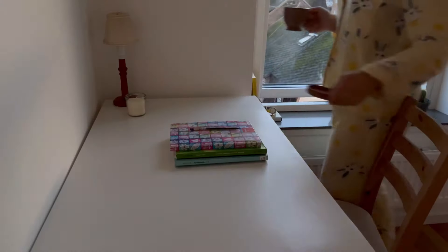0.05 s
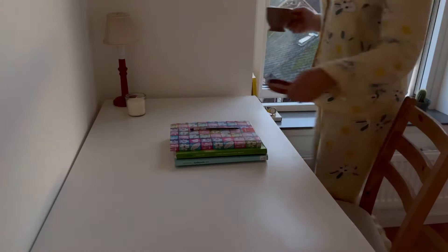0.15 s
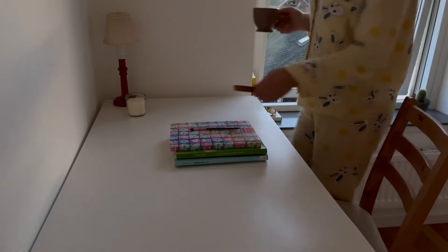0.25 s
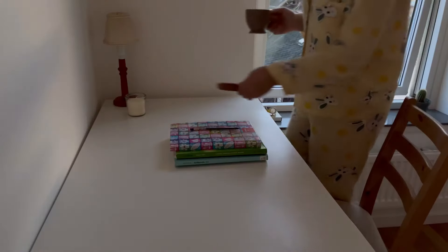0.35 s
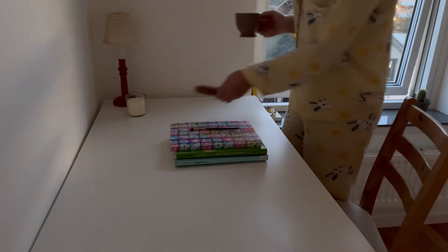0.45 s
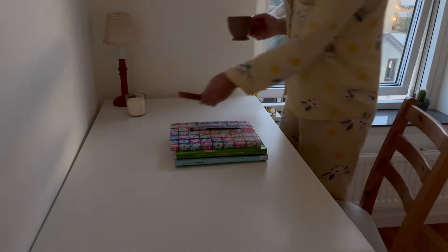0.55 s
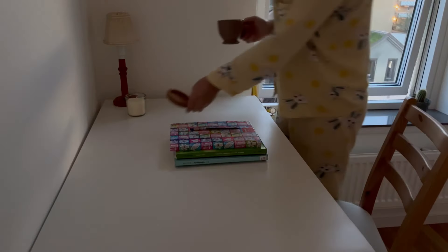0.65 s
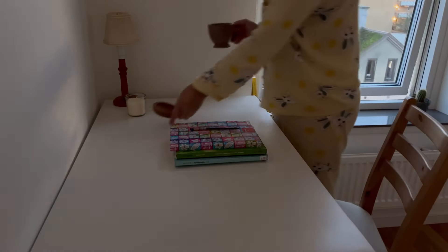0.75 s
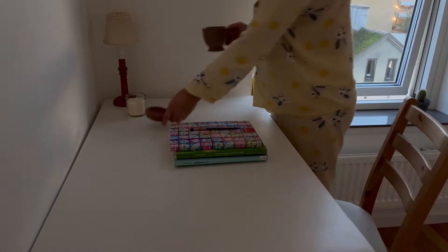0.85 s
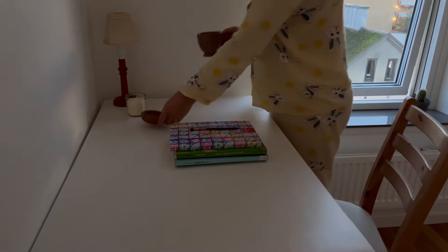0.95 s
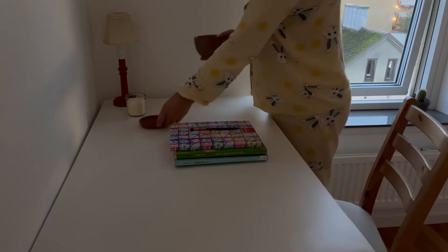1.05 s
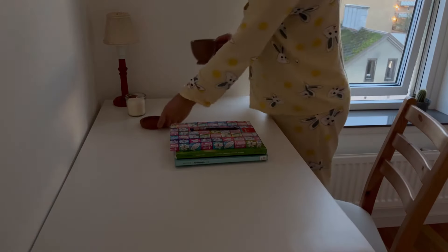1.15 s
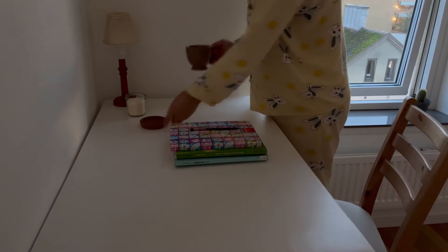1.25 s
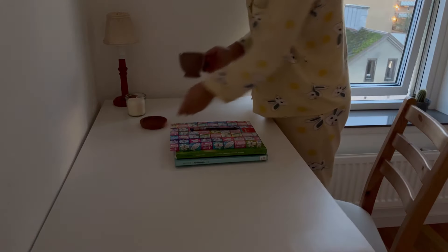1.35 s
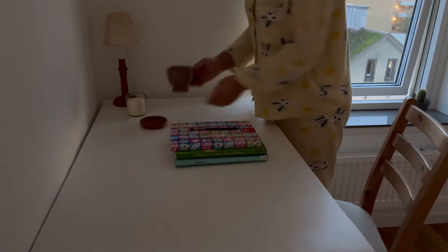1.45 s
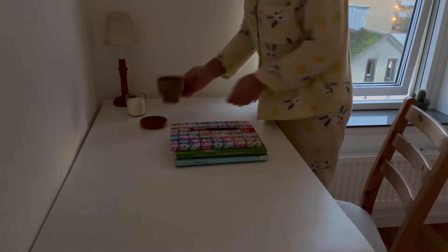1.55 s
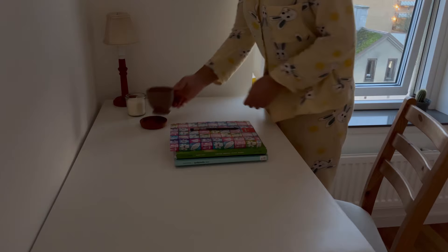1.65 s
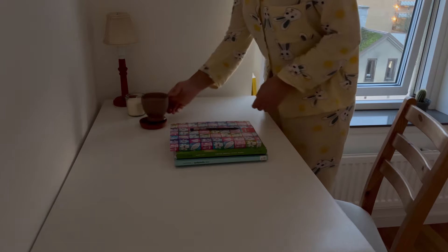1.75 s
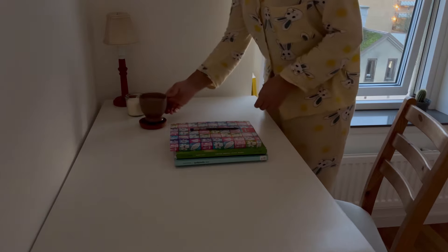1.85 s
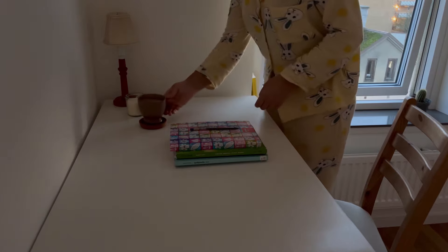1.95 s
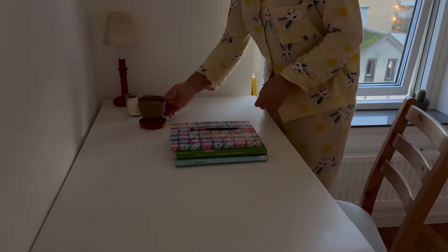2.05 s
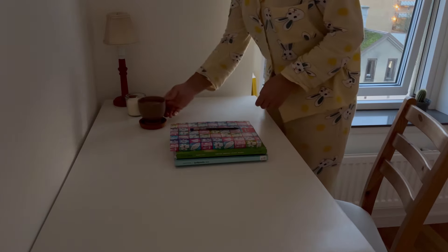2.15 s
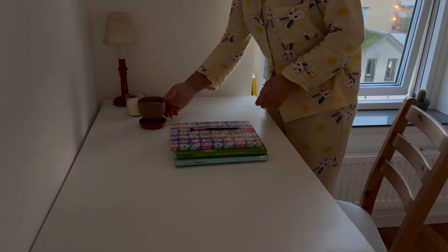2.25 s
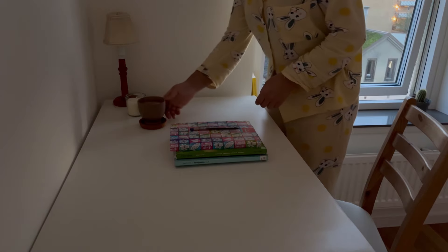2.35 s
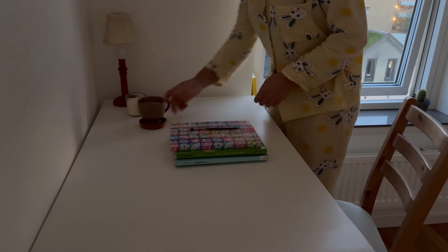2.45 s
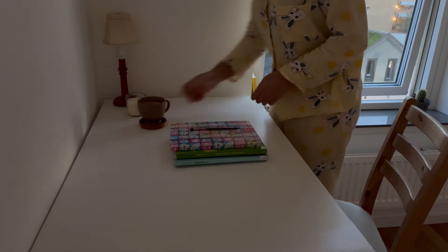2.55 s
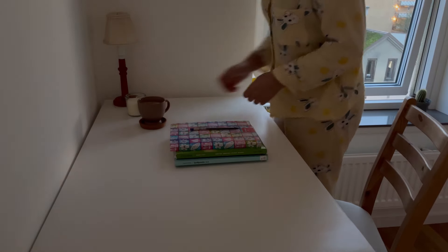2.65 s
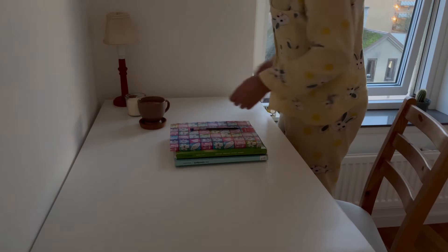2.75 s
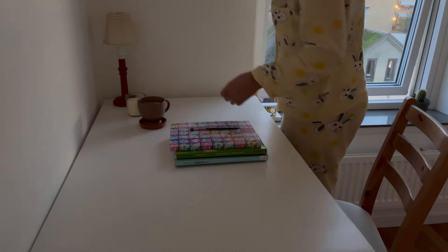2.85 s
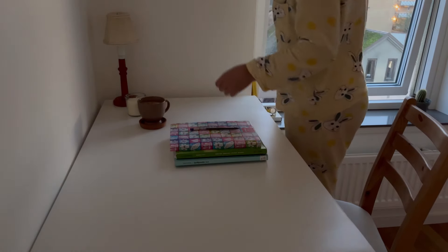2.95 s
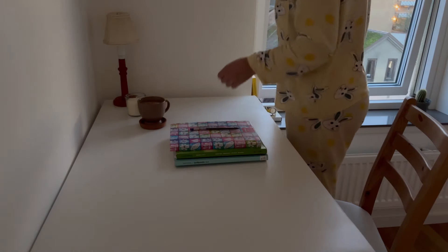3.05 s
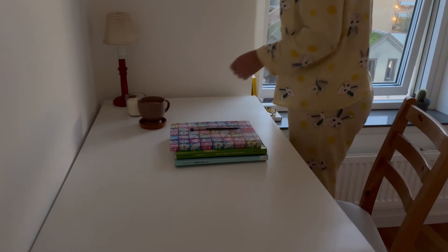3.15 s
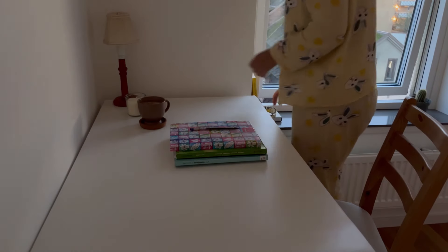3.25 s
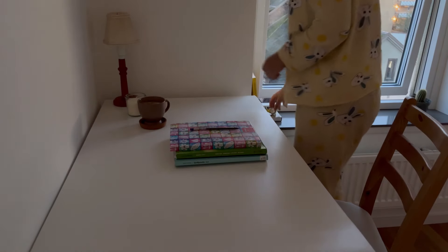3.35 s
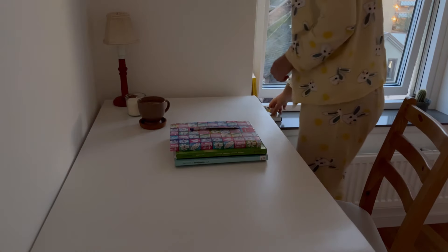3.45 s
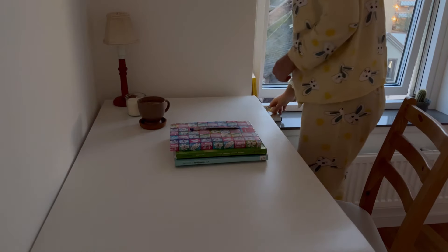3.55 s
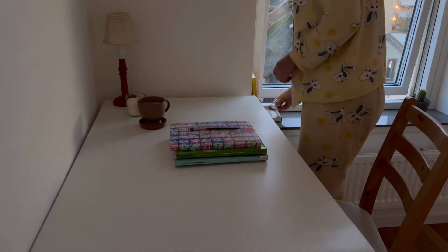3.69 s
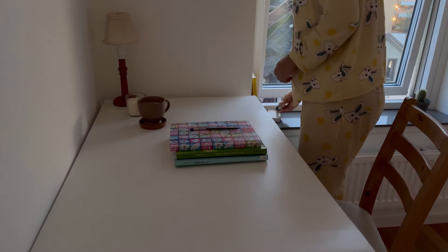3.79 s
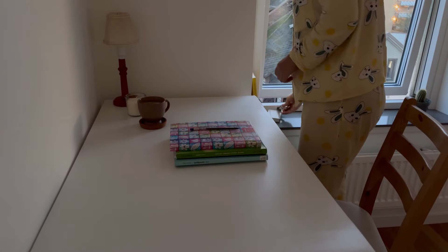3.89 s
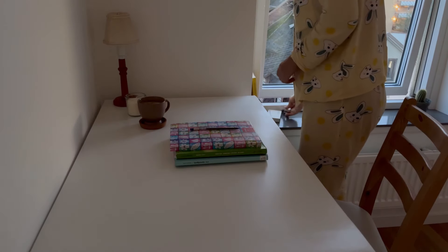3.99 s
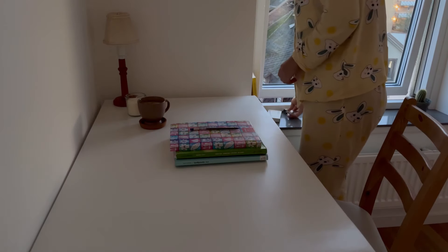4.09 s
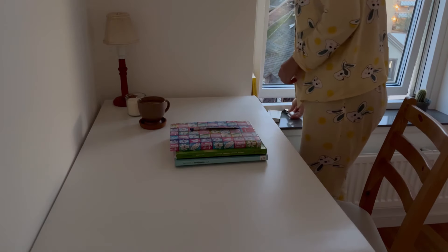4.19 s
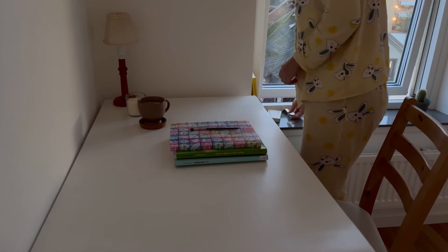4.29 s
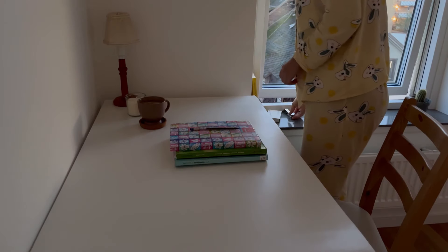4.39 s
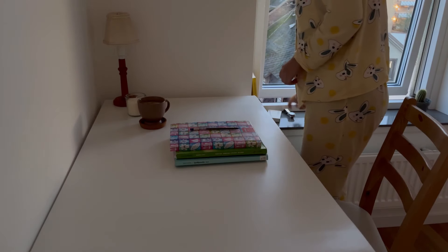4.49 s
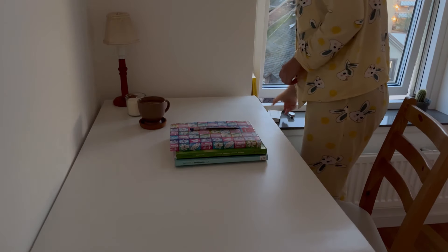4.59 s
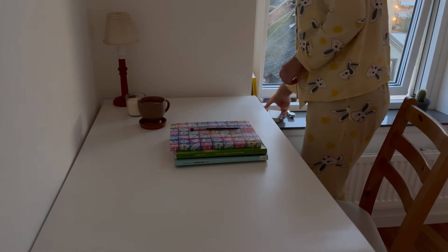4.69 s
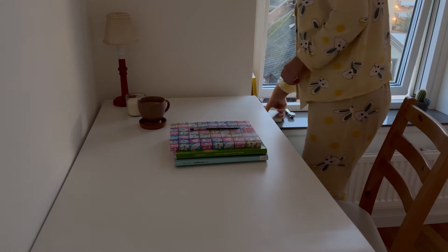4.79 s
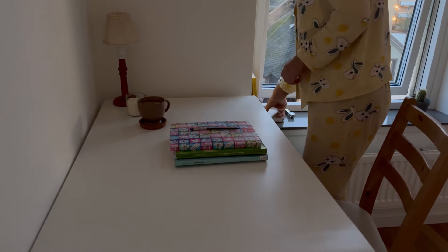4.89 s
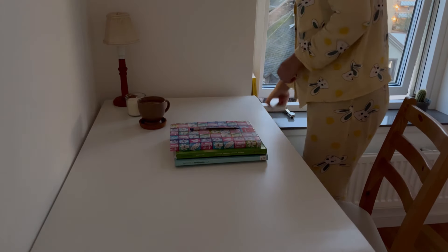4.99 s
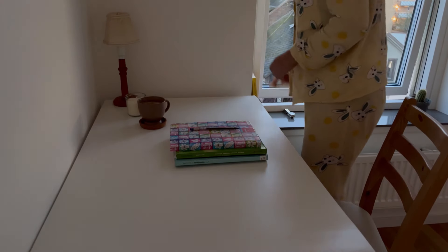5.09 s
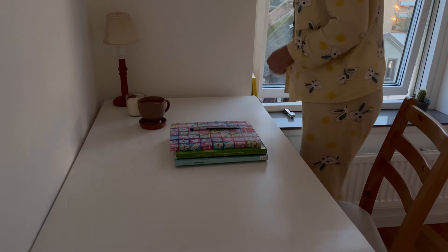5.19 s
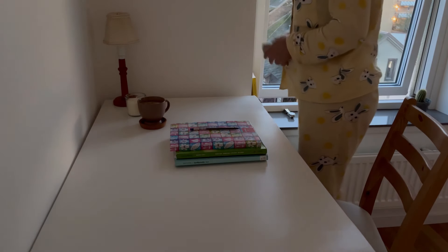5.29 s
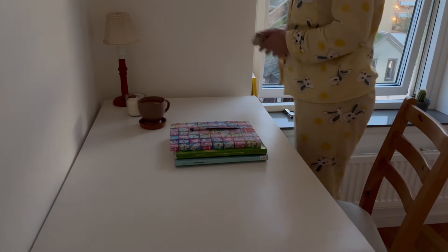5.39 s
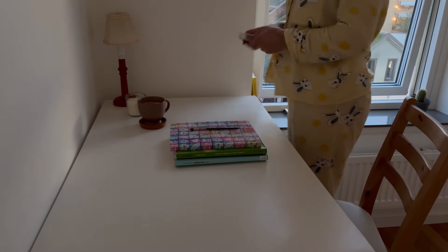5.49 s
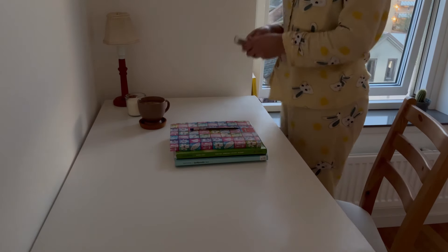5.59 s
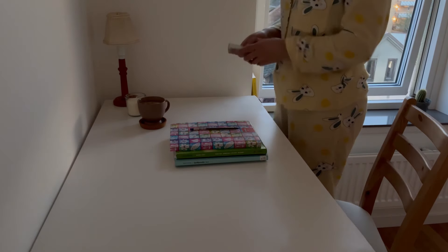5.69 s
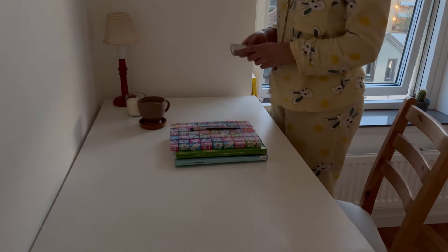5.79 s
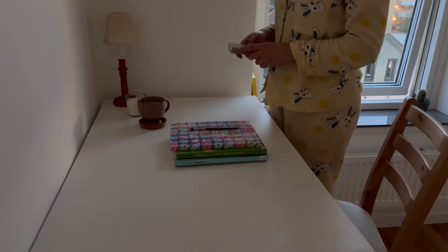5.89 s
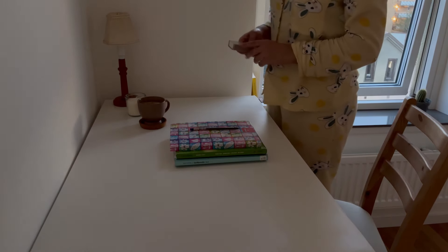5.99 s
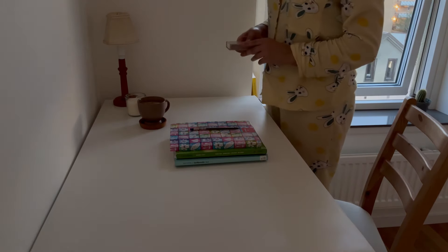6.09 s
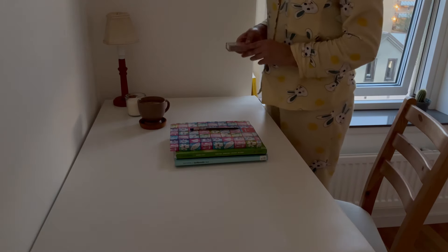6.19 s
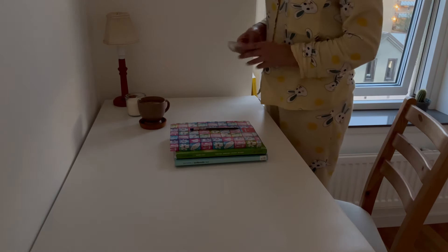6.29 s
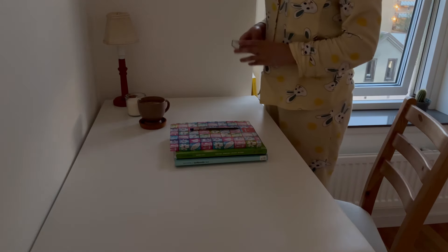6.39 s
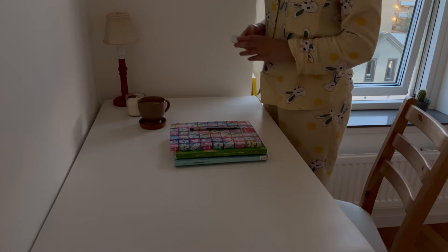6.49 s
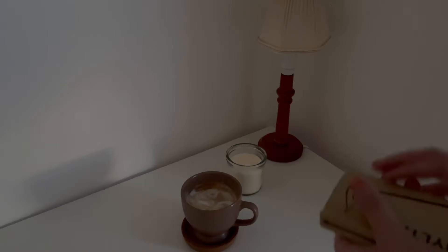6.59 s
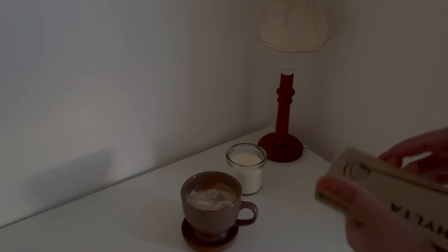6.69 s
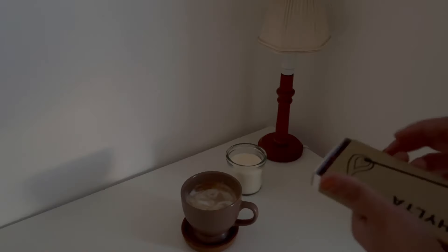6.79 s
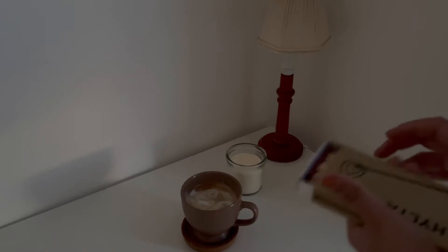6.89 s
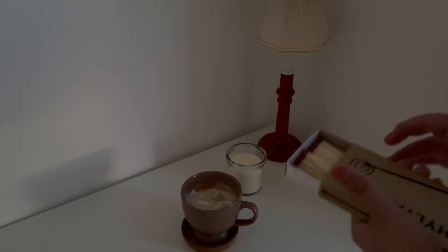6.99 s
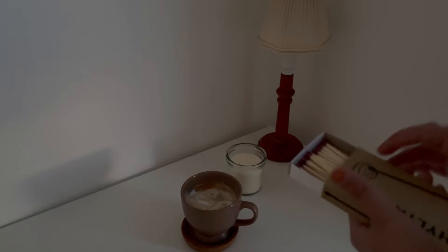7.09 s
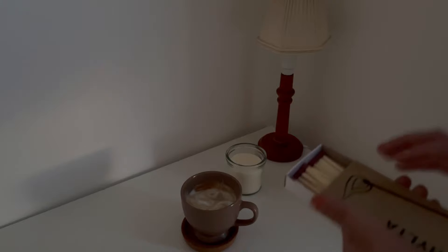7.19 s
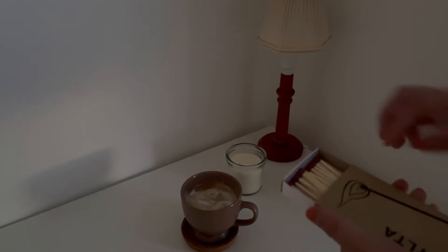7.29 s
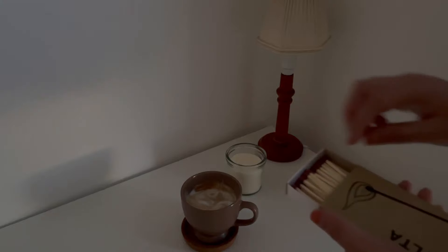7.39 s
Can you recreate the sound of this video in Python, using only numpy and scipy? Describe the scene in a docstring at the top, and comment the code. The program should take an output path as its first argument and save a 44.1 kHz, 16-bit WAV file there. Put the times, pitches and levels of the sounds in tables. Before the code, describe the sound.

A small, quiet, lively room, heard in stereo slightly louder on the left, with faint air and soft low rumble. From 0 s sleeves and trousers brush very softly; a tiny knock falls at 0.9 s. At 1.05 s a saucer touches the wooden desk with a sharp, short, dry clack. At 1.75 s a full ceramic cup meets it: a deep woody thud with a small gritty clink, repeated at 2.08 s as it settles. Cloth rustles from 2.6 s. Between 3.4 and 4 s small objects on the window sill knock and tick lightly, some bright. Fingers rub from 5 s, and at about 5.5-5.65 s matches rattle crisply in their box. Faint rubbing and a light tick follow. From 6.75 to 7.15 s the cardboard drawer scrapes open in three swelling pushes, close and dry, the middle longest, ending in slight finger rubbing.

```python
"""A small, quiet room: someone in pyjamas puts a saucer on a wooden desk and a full ceramic cup on it,
rummages on the window sill and picks up a box of rattling matches; close by, its drawer is pushed open.
Desk, saucer and cup are sums of damped modes; light knocks and matches are coloured clicks and scuffs;
cloth, fingers and drawer are trains of random slips; air and rumble are coloured noise.
Echoes are decaying noise."""
import sys
import numpy as np
from scipy import signal
from scipy.fft import rfft, irfft
from scipy.io import wavfile

SR = 44100
rng = np.random.default_rng(int(sys.argv[2]) if len(sys.argv) > 2 else 0)


def store_pcm(level_fs):
    """Save levels as 16-bit WAV."""
    pcm = np.round(np.clip(level_fs, -1, 1) * 32767).astype(np.int16)
    wavfile.write(sys.argv[1], SR, np.atleast_2d(pcm).T)


N = 328104
T = np.arange(N) / SR
TAIL = T[:SR * 3 // 4]
CLICK = 1. * (TAIL == 0)


def undb(db):
    """Amplitude gain of a level in dB."""
    return 10 ** (np.asarray(db) / 20)


def unit(x):
    """Scale to rms 1."""
    return x / np.sqrt(np.mean(x ** 2))


def strength(x):
    """Scale a short sound to the energy of 10 ms at rms 1."""
    return x / np.sqrt(np.sum(x ** 2) / (SR / 100))


def along(points, hz):
    """Read (Hz, value) points on a log-frequency axis."""
    f, value = np.transpose(points)
    return np.interp(np.log(hz + 1), np.log(f), value)


def colour(x, points, size=8192):
    """Causal minimum-phase filter with the gain of (Hz, dB) points."""
    log_gain = np.log(undb(along(points, np.fft.rfftfreq(size, 1 / SR))))
    cepstrum = irfft(log_gain)
    # fold the cepstrum onto positive time
    cepstrum[1:size // 2] *= 2
    cepstrum[size // 2 + 1:] = 0
    impulse = irfft(np.exp(rfft(cepstrum)))
    return signal.fftconvolve(x, impulse)[:len(x)]


def ring(modes):
    """Free ringing of (Hz, dB, t60 s) modes."""
    total = 0
    for hz, db, t60_s in modes:
        decay = np.exp(-np.log(1000) * TAIL / t60_s)
        total = total + undb(db) * np.sin(2 * np.pi * hz * TAIL) * decay
    return total


def press(x, soft_ms):
    """A soft contact spreads the blow in time and dulls it."""
    push = TAIL * np.exp(-TAIL * 1000 / max(soft_ms, .01))
    return signal.fftconvolve(x, push / push.sum())[:len(x)]


def add(track, s, x):
    """Mix x into the track at time s."""
    i = max(int(s * SR), 0)
    track[i:i + len(x)] += x[:N - i]


def grains(size, rate_hz, spread_db):
    """Tiny slips of random sign and size, at a mean rate."""
    slips = rng.random(size) < rate_hz / SR
    sign = rng.choice([-1, 1], size)
    excess_db = spread_db * np.minimum(rng.exponential(size=size), 4)
    return slips * sign * undb(excess_db)


def scuff(decay_ms, rate_hz=12000, spread_db=2.0):
    """A contact: a cluster of tiny slips that builds quickly and dies away."""
    age = TAIL[:SR // 10] * 1000 / max(decay_ms, .2)
    return grains(len(age), rate_hz, spread_db) * np.exp(-age) * (1 - np.exp(-age * 3))


def bounces(s, db, gap_s, fall_db, count):
    """Times and levels of a contact and its weaker repeats."""
    return [(s + k * gap_s, db + k * fall_db) for k in range(count)]


def wander(age, rate_hz):
    """Random values at a fixed rate, joined by straight lines."""
    return np.interp(age * rate_hz, np.arange(64), rng.standard_normal(64))


def stroke(age, length_s, attack_s, release_s, swell_db_per_s=0):
    """Gain of one movement: it sets in, holds or swells for its length, then dies away."""
    attack = np.sin(np.pi / 2 * np.clip(age / attack_s, 0, 1)) ** 2
    swell = undb(swell_db_per_s * np.minimum(age - length_s, 0))
    return attack * swell * np.exp(-np.maximum(age - length_s, 0) / release_s)


def rubbing(strokes, points, attack_s, release_s, rate_hz, spread_db, uneven_db, swell_db_per_s=0):
    """Fibres catch and let go under uneven pressure during each stroke, coloured by the rubbed thing."""
    track, age = np.zeros(N), TAIL[:SR // 2]
    for s, length_s, db, treble_db in strokes:
        pressure = undb(uneven_db * wander(age, rate_hz=70))
        slips = grains(len(age), rate_hz, spread_db) * pressure
        fibres = colour(unit(colour(slips, points)), [(6000, 0.021), (12000, treble_db)])
        gain = stroke(age, length_s, attack_s, release_s, swell_db_per_s)
        add(track, s, undb(db) * fibres * gain)
    return track


# Decay of the echoes. Each row: frequency in Hz, t60 in s.
ECHO_T60 = [(100, 0.097), (300, 0.45), (800, 0.35), (2000, 0.4), (5000, 0.37), (13000, 0.24)]


def room(x, wet_db, build_s=0.00089, to_walls=None, early=0.94, early_s=0.042):
    """Direct sound and dense echoes of close walls, as mid and side; to_walls is what radiates off axis."""
    hz = np.fft.rfftfreq(len(TAIL), 1 / SR)
    noise, tail = rfft(rng.standard_normal((2, len(TAIL)))), 0
    for f, t60_s in ECHO_T60:
        share = along([(g, g == f) for g, _ in ECHO_T60], hz)
        tail = tail + irfft(noise * share, len(TAIL)) * np.exp(-np.log(1000) * TAIL / t60_s)
    # the desk top and the corner behind it send back a strong first wave
    tail = tail * (1 - np.exp(-TAIL / build_s)) * (1 + early * np.exp(-TAIL / early_s))
    tail *= undb(wet_db) / np.sqrt(np.sum(tail[0] ** 2))
    source = x if to_walls is None else to_walls
    mid, side = signal.fftconvolve([source], tail, axes=1)[:, :N]
    return np.array([x + mid, side]) / np.hypot(1, undb(wet_db))


# Blows on the desk and steps that jolt it. Each row: start in seconds, relative level of the desk thud
# in dB, relative level of the saucer clack in dB, contact softness in ms, thud lag in ms.
DESK_BLOWS = [(0.008, -44, -49.5, 0.77, 6.8), (0.555, -48, -61, 0.45, 1.8),
              (1.0482, -34.5, -26.5, 0.034, 1.4), (1.0528, -33.5, -35.5, 0.2, 0.85),
              (1.155, -50, -41.5, 0.64, 2.06), (1.7536, -17.5, -42, 0.095, 3.16),
              (2.0773, -16.5, -40, 0.18, 1.62)]
# Desk top modes. Each row: frequency in Hz, relative level in dB, t60 in s.
DESK_MODES = [(83.8, -23.5, 0.7), (123, -18.5, 0.36), (162.5, -3.5, 0.45), (186, 4, 0.083),
              (225.8, 1.5, 0.081), (249, -8, 0.089), (366.8, -15, 0.27), (384, -18.5, 0.2),
              (550, -22.5, 0.16)]
# Desk radiation: little deep bass, an anti-resonance. Each row: frequency in Hz, gain in dB.
DESK_RADIATION = [(30, -26), (65, -1), (258, 3), (285, -21), (330, -5), (355, -2)]
# Saucer modes, damped by the wood. Each row: frequency in Hz, relative level in dB, t60 in s.
SAUCER_MODES = [(369, 4.5, 0.043), (559, 6, 0.08), (676, -19, 0.032), (806, -6, 0.071), (1090, 13.5, 0.06),
                (1440, -1, 0.017), (1500, 0, 0.024), (2100, 6, .025), (2700, -15.5, .02)]
# Spectrum of the saucer clack. Each row: frequency in Hz, gain in dB.
CLACK_SPECTRUM = [(120, -23.5), (400, -3), (900, -4), (1600, -4), (2400, -14.5), (3300, -20.5),
                  (4200, -29.5), (7000, -34.5), (15000, -37)]


def crockery(swell_s=0.0021, saucer_ring_db=-5):
    """The saucer clacks at first touch; the weight follows and the desk top booms."""
    thuds, clacks = np.zeros((2, N))
    desk_swell = 1 - np.exp(-(TAIL / swell_s) ** 2)
    desk = strength(colour(ring(DESK_MODES) * desk_swell, DESK_RADIATION))
    clack = strength(colour(CLICK, CLACK_SPECTRUM))
    saucer = clack + undb(saucer_ring_db) * strength(ring(SAUCER_MODES))
    for s, thud_db, clack_db, soft_ms, lag_ms in DESK_BLOWS:
        add(thuds, s + lag_ms / 1000, undb(thud_db) * desk)
        add(clacks, s, undb(clack_db) * strength(press(saucer, soft_ms)))
    return undb(1.5) * room(thuds, wet_db=-8.5) + room(clacks, wet_db=2.0, build_s=0.0014)


# Tick of small hard contacts, cup and knocks alike. Each row: frequency in Hz, gain in dB.
TICK_SPECTRUM = [(100, 10.5), (400, -9.5), (1200, -1), (2400, 0), (4500, -12), (7000, -14.5),
                 (15000, -22.5)]
# Foot of the cup meeting the saucer. Each row: start in seconds, relative ring level in dB,
# relative tick level in dB, treble gain in dB.
CUP_CONTACTS = [(1.7535, -43, -46, 1), (2.075, -42, -49.5, -4.5)]
# Cup modes, damped by hand and drink. Each row: frequency in Hz, relative level in dB, t60 in s.
CUP_MODES = [(1116, 0, 0.019), (1630, -5.5, .014), (5480, -18, .006)]


def cup(scuff_ms=1.3):
    """The foot of the cup grates briefly on the saucer and clinks, each touch with its own treble."""
    direct, to_walls = np.zeros((2, N))
    tick = strength(colour(CLICK, TICK_SPECTRUM))
    body = strength(ring(CUP_MODES))
    for s, ring_db, tick_db, treble_db in CUP_CONTACTS:
        clink = undb(tick_db) * tick + undb(ring_db) * body
        clink = colour(clink, [(1600, 1), (2600, -5), (5000, treble_db)])
        grate = scuff(scuff_ms)
        add(direct, s, signal.fftconvolve(clink, grate / np.linalg.norm(grate)))
        add(to_walls, s + scuff_ms / 2000, clink)  # half the scuff time later
    return np.array([direct, to_walls])


def struck(force, hz, ring_db, treble_db, ring_cycles=20):
    """A light object answers with a broad tick, brighter if it is hard, and one short resonance."""
    force = force[:SR // 10]
    tick = strength(colour(force, TICK_SPECTRUM))
    tick = colour(tick, [(4500, 0.02), (11000, treble_db)])
    body = signal.fftconvolve(force, ring([(hz, 0, ring_cycles / hz)]))[:len(force)]
    return tick + undb(ring_db) * strength(body)


# Small things knocking together. Each row: start in seconds, relative level in dB, ring frequency in Hz,
# relative ring level in dB, treble gain in dB, scuff decay in ms.
SMALL_KNOCKS = [(0.006, -61.5, 398, 10.5, 3, 4.6), (0.875, -42.5, 687, -7, -4.5, 2.36),
                (3.37, -43, 1360, 3, 1.5, 4.8), (3.378, -53, 416, 9.5, -3, 1.87),
                (3.398, -46, 1097, 4.5, -18, 5.4), (3.583, -53, 4680, -3.5, 15.5, 1.32),
                (3.693, -57, 9450, 7, 26.5, 1.17), (3.775, -46.5, 1190, -8.5, 5, 4),
                (3.885, -64, 1226, 9, -14, 6.5), (3.971, -41.5, 11800, 7, 32.5, 4.5),
                (3.985, -46.5, 872, 3, 13.5, 4.7), (5.085, -56.5, 1060, 3.5, -14, 5.6),
                (5.339, -50.5, 2320, 4, -16, 0.5), (5.395, -42.5, 1280, -4.5, -10, 8.4),
                (6.349, -49.5, 2730, -13, -10, 1.36), (6.836, -53, 353, -1, -9, 2.3),
                (7.122, -56, 1710, 11, -8, 2.38)]


def knocks(settle_s=0.019, settle_db=-11.5):
    """Light things touch and settle; over all directions the slips of a scuff merge into one click."""
    direct, to_walls = np.zeros((2, N))
    for first_s, first_db, hz, ring_db, treble_db, ms in SMALL_KNOCKS:
        near = struck(scuff(ms), hz, ring_db, treble_db)
        far = struck(CLICK, hz, ring_db, treble_db)
        for s, db in bounces(first_s, first_db, settle_s, settle_db, count=2):
            add(direct, s, undb(db) * near)
            add(to_walls, s + ms / 2000, undb(db) * far)
    return np.array([direct, to_walls])


def touches():
    """The clinks and light knocks are far off and heard mostly by way of the walls."""
    direct, to_walls = cup() + knocks()
    return undb(-2.0) * room(direct, wet_db=5.5, build_s=0.002, to_walls=to_walls)


# Matches sliding against the end of their box. Each row: start in seconds, relative level in dB,
# spread in ms.
MATCH_BUNCHES = [(5.514, -40, 7.3), (5.526, -30.5, 1.94), (5.570, -32.5, 5.3), (5.645, -39.5, 10),
                 (5.783, -58, 6), (5.861, -58.5, 3)]
# Spectrum of the struck box. Each row: frequency in Hz, gain in dB.
BOX_SPECTRUM = [(150, -31), (350, -12), (500, -15), (700, -11), (1000, -6), (1330, -1.5), (1900, -10.5),
                (2550, -1.5), (3600, -7), (5000, -12), (8000, -19.5), (12000, -26.5), (15500, -21.5)]


def matches(straggle_s=0.017, straggle_db=-7):
    """Loose sticks hit cardboard in bunches, with weaker stragglers; the walls get each as one burst."""
    direct, to_walls = np.zeros((2, N))
    burst = strength(colour(CLICK, BOX_SPECTRUM))
    for first_s, first_db, ms in MATCH_BUNCHES:
        for s, db in bounces(first_s, first_db, straggle_s, straggle_db, count=3):
            sticks = scuff(ms, rate_hz=5200, spread_db=0)
            add(direct, s, undb(db) * strength(colour(sticks, BOX_SPECTRUM)))
            add(to_walls, s + ms / 2000, undb(db) * burst)
    return undb(1.0) * room(direct, wet_db=1.0, build_s=0.0036, to_walls=to_walls)


# Three pushes of the drawer through its sleeve. Each row: start in seconds, length in seconds,
# relative level in dB, treble gain in dB.
DRAWER_PUSHES = [(6.745, 0.076, -47, 0.5), (6.84, 0.15, -41.5, 1), (7.06, 0.056, -45.5, 4)]
# Spectrum of the drawer. Each row: frequency in Hz, gain in dB.
DRAWER_SPECTRUM = [(200, -26), (360, -12), (600, -10), (1150, -7.5), (1700, 3.5), (2100, -4), (3400, -4),
                   (5500, -11.5), (9000, -13), (15500, -17)]


def drawer():
    """Cardboard rubs in its sleeve close by; the thumb presses harder through each push."""
    slide = rubbing(DRAWER_PUSHES, DRAWER_SPECTRUM, attack_s=0.029, release_s=0.017,
                    rate_hz=3600, spread_db=0.5, uneven_db=3.0, swell_db_per_s=85)
    return room(undb(-1.5) * slide, wet_db=-6.0)


# Fingers rubbing the matchbox. Each row: start in seconds, length in seconds, relative level in dB,
# treble gain in dB.
FINGER_STROKES = [(5.042, 0.053, -50.5, -1.5), (5.218, 0.041, -52.5, -11), (5.325, 0.18, -55.5, 3),
                  (5.72, 0.2, -65.5, 9.5), (5.98, 0.12, -69.5, 5), (6.15, 0.024, -58.5, 11),
                  (6.25, 0.095, -56, 5.5), (6.44, 0.17, -65.5, 9.5), (6.62, 0.03, -57, 10.5),
                  (6.69, 0.071, -66, 8), (7.3, 0.18, -65.5, 1)]
# Spectrum of the rubbed matchbox. Each row: frequency in Hz, gain in dB.
FINGER_SPECTRUM = [(300, -20), (650, 1.5), (1000, 6), (2400, 6), (4000, -0.5), (8000, -6.5), (15000, -15.5)]


def fingers():
    """Skin catches and slips on the matchbox under nearly even pressure."""
    return undb(-3.5) * rubbing(FINGER_STROKES, FINGER_SPECTRUM, attack_s=0.042, release_s=0.02,
                                rate_hz=2000, spread_db=2.5, uneven_db=0.16)


# Sleeves and trousers brushing. Each row: start in seconds, length in seconds, relative level in dB,
# treble gain in dB.
CLOTH_STROKES = [(0.0, 0.14, -67, 5), (0.13, 0.063, -63.5, 8.5), (0.23, 0.18, -77, 10),
                 (0.48, 0.19, -71, 5), (0.65, .07, -68, 10), (1.41, 0.17, -77, 3), (2.59, 0.1, -68, 3),
                 (2.695, 0.053, -62.5, 6), (2.82, 0.03, -66.5, 12), (2.98, 0.071, -68, 7),
                 (3.08, 0.59, -76.5, 11.5), (3.44, 0.049, -60, 3), (3.575, 0.019, -53.5, 5),
                 (3.68, 0.05, -58, -6), (3.85, 0.3, -66.5, 2), (4.24, 0.042, -78.5, 13.5),
                 (4.71, 0.032, -66.5, 9.5)]
# Spectrum of the cloth. Each row: frequency in Hz, gain in dB.
CLOTH_SPECTRUM = [(300, 1.5), (1200, -0.5), (3000, -3.5), (5500, -5), (9000, -14), (15000, -16.5)]


def cloth():
    """Fibres of sleeves and trousers catch and let go as they brush."""
    return undb(-2.5) * rubbing(CLOTH_STROKES, CLOTH_SPECTRUM, attack_s=0.023, release_s=0.02,
                                rate_hz=4100, spread_db=3.5, uneven_db=1.4)


def handling():
    """Cloth and fingers across the room; the matchbox drawer close by."""
    return room(cloth() + fingers(), wet_db=1.5) + drawer()


def mid_side_noise(points):
    """Independent coloured noise of rms 1 for mid and side."""
    return np.array([unit(colour(rng.standard_normal(N), points)) for _ in range(2)])


# Stretches of low rumble. Each row: start in seconds, length in seconds, relative level in dB.
RUMBLE_STRETCHES = [(0.0, 3.06, -58), (5.3, 0.48, -58), (6.63, 1.1, -53.5)]
# Spectrum of the rumble. Each row: frequency in Hz, gain in dB.
RUMBLE_SPECTRUM = [(25, -16.5), (45, -10.5), (68, 1.5), (95, -10.5), (125, 2.5), (165, -8.5), (230, -16.5),
                   (360, -16), (600, -23.5), (1500, -49.5)]


def rumble():
    """Low coloured noise that sets in quickly and fades slowly."""
    gain = 0
    for s, length_s, db in RUMBLE_STRETCHES:
        gain = gain + undb(db) * stroke(T - s, length_s, attack_s=0.069, release_s=0.97)
    return gain * undb(-4.5) * mid_side_noise(RUMBLE_SPECTRUM)


# Spectrum of the room air. Each row: frequency in Hz, gain in dB.
AIR_SPECTRUM = [(25, -20), (45, -14.5), (66, -6), (125, -7.5), (200, -18.5), (350, -27), (650, -29.5),
                (1120, -21), (1550, -33), (1820, -32.5), (2700, -48), (4400, -45), (7500, -57),
                (15500, -60)]


def air(level_db=-61.5):
    """Steady coloured noise of the room air."""
    return undb(level_db) * mid_side_noise(AIR_SPECTRUM)


# How unlike the two ports hear the room. Each row: frequency in Hz, side gain in dB.
SIDE_GAIN = [(60, -25), (200, -8), (400, -6.5), (700, -2), (1300, 3.5), (2200, -2.5), (4500, -1),
             (7500, -1), (9500, -31)]
# Left minus right. Each row: frequency in Hz, difference in dB.
LEFT_MINUS_RIGHT = [(50, 1.7), (200, 3.3), (600, 3.8), (1200, 2.5), (2500, 4.8), (5000, 3.8), (8000, 0)]


def scene():
    """All sources at two close ports: alike in the bass, the left a little louder."""
    mid, side = crockery() + touches() + matches() + handling() + rumble() + air()
    side = colour(side, SIDE_GAIN)
    ports = []
    for sign in (1, -1):
        balance = [(hz, sign * db / 2) for hz, db in LEFT_MINUS_RIGHT]
        ports.append(colour(mid + sign * side, balance))
    return np.array(ports)


# Bass response of the microphone. Each row: frequency in Hz, gain in dB.
MIC_BASS = [(20, -15.5), (45, -1.5), (80, -0.5)]
# Band of the phase turn: lower edge in Hz, upper edge in Hz.
TURN_BAND_HZ = [6700, 13500]


def record(dry, top_hz=15850):
    """Through the treble the left port slips a full cycle behind; deep bass and the top are cut."""
    left, right = (colour(x, MIC_BASS) for x in dry)
    turn_rad = np.interp(np.fft.rfftfreq(N, 1 / SR), TURN_BAND_HZ, [0, 2 * np.pi])
    left = irfft(rfft(left) * np.exp(-1j * turn_rad), N)
    low_pass = signal.ellip(10, .2, 70, top_hz, fs=SR, output="sos")
    return signal.sosfilt(low_pass, [left, right])


dry = scene()
out = record(dry)
store_pcm(out)
```